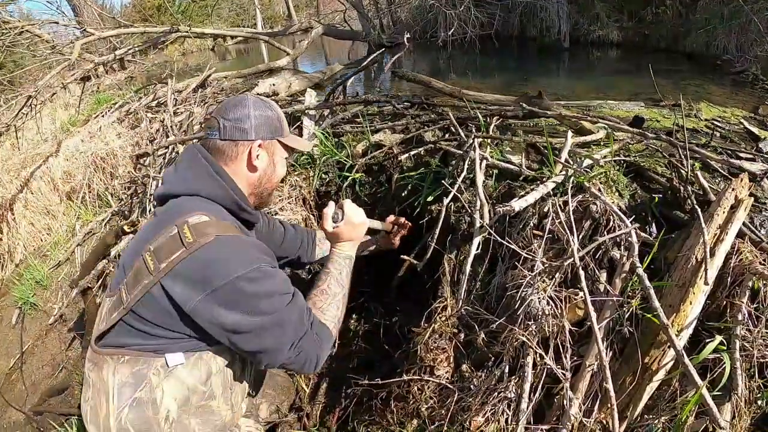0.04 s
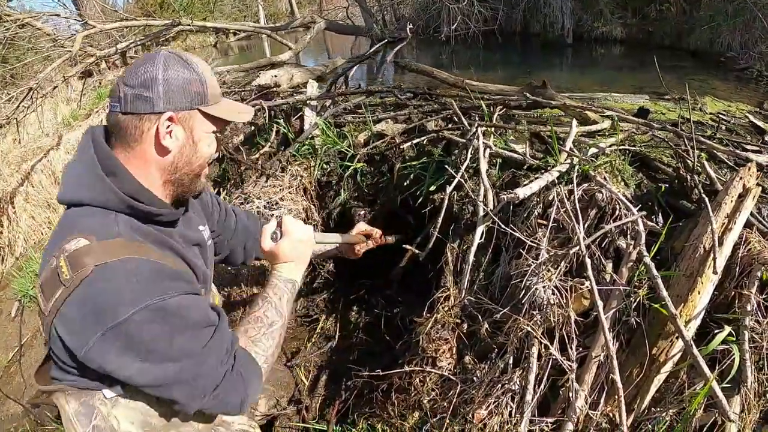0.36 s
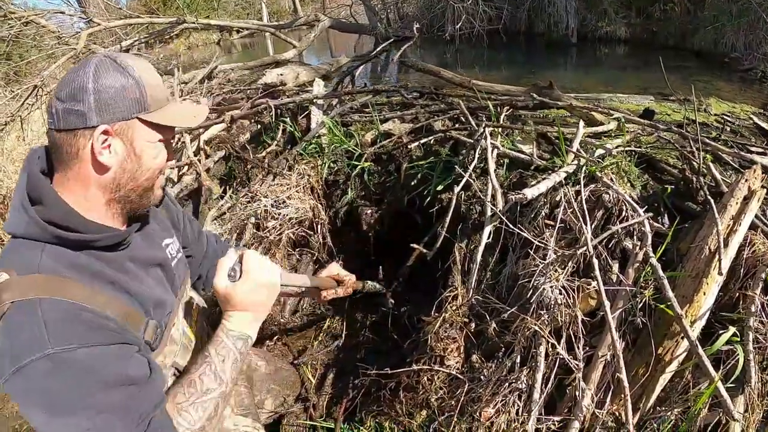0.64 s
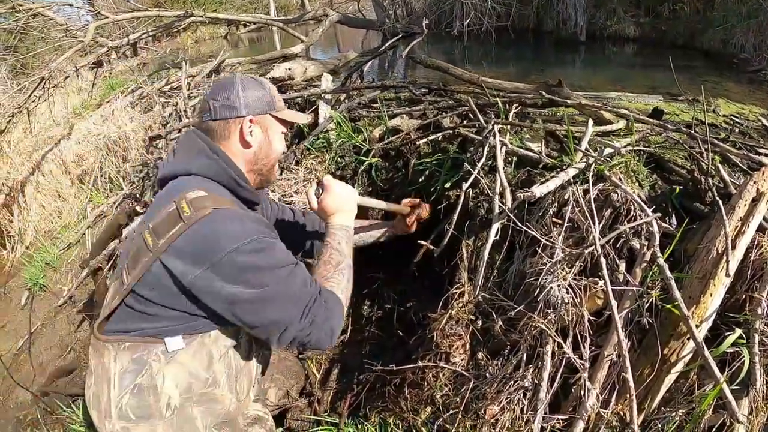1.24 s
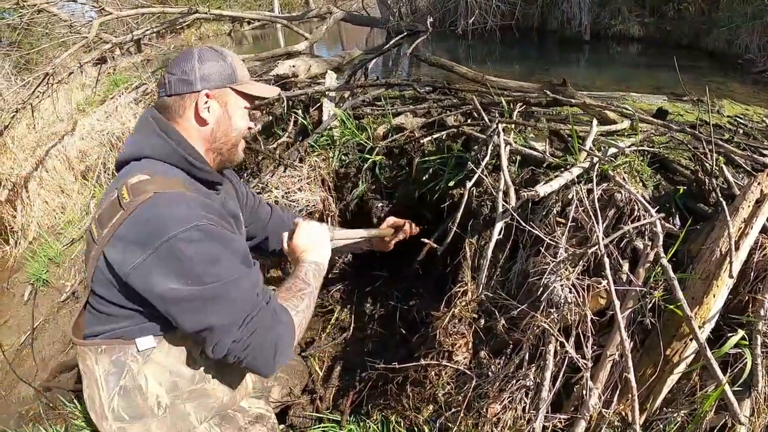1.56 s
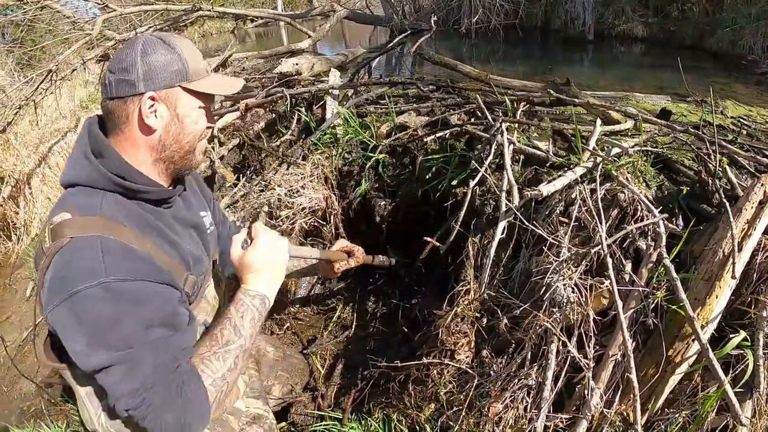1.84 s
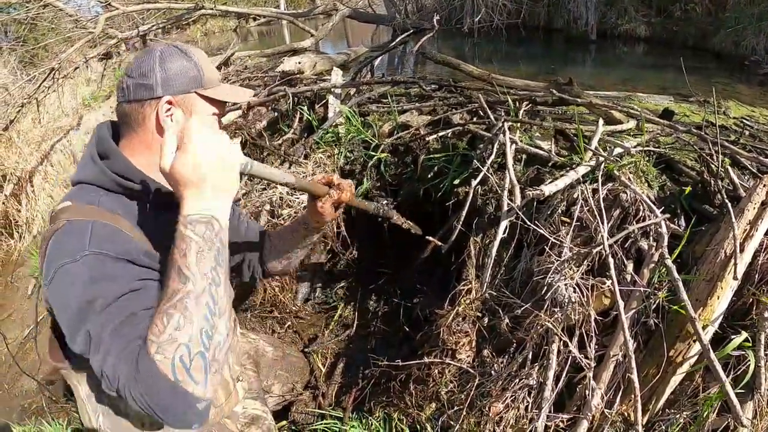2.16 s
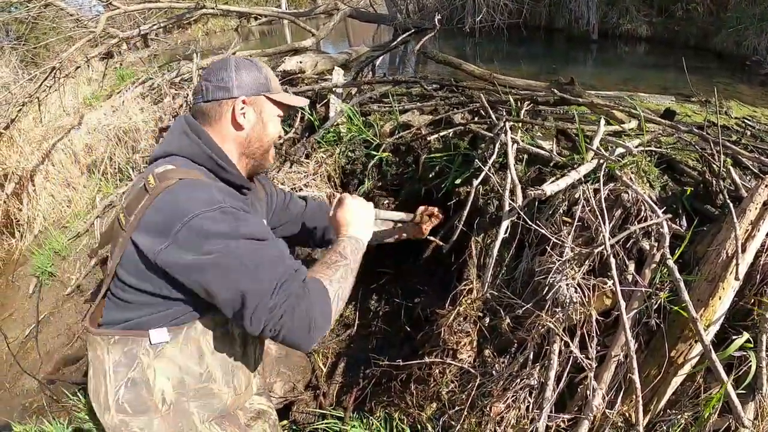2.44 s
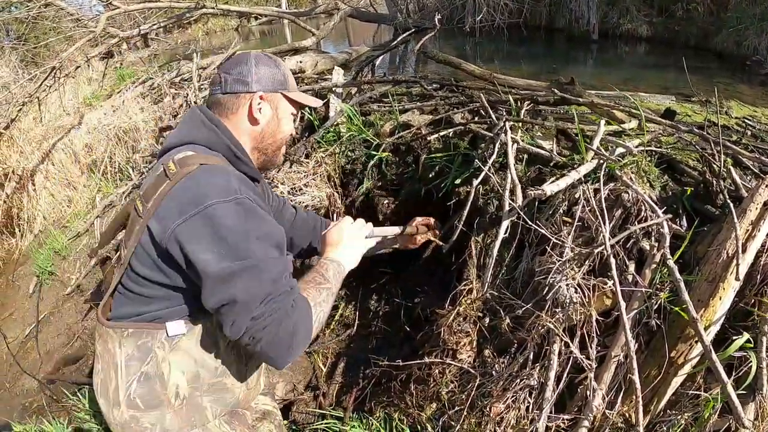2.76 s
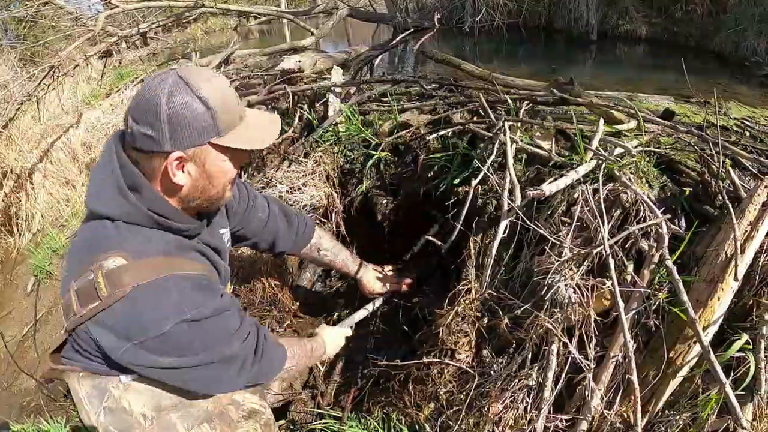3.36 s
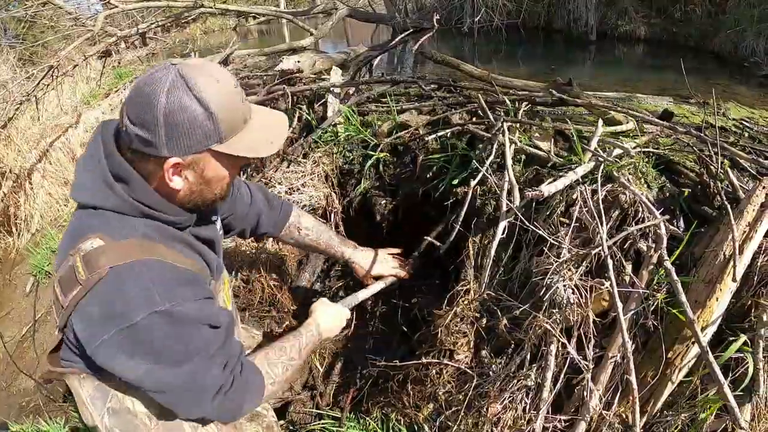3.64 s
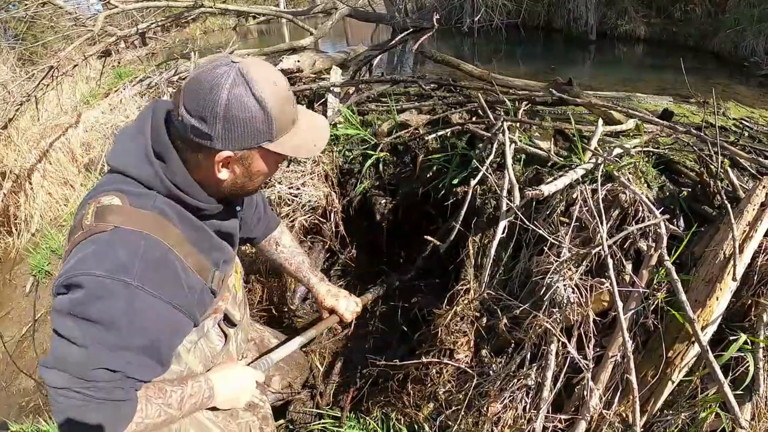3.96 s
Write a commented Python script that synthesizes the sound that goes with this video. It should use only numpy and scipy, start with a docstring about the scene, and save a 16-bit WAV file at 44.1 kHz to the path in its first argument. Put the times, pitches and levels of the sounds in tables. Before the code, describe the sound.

A long-handled tool chops into a dam of mud and sticks, close up outdoors. About five blows thud and snap twigs, some with a light steel clink, followed by smaller cracks and scrapes. Water trickles softly underneath.

```python
"""A long-handled tool chops and prises at a dam of mud and sticks, close up, outdoors. Each blow thuds in the
mud, snaps twigs and may ring the steel head; between blows the tool drags through wet brush. Underneath, water
pours over the dam in a steady bed of rush, bubbles and crackle, with single drips on top. Near the end, a few
soft low thumps sound."""
import sys
import numpy as np
from scipy import signal
from scipy.fft import rfft, irfft
from scipy.io import wavfile
from scipy.ndimage import uniform_filter1d, map_coordinates

SR = 44100
rng = np.random.default_rng(int(sys.argv[2]) if len(sys.argv) > 2 else 0)


def store_pcm(level_fs):
    """Save levels as 16-bit WAV."""
    pcm = np.round(np.clip(level_fs, -1, 1) * 32767).astype(np.int16)
    wavfile.write(sys.argv[1], SR, np.atleast_2d(pcm).T)


N = 176400
LEVEL_S = .008  # a hit carries the energy of this long a sound at its level
TOP_HZ = 15300  # upper limit of the mix


def undb(db):
    """Decibels to gain."""
    return 10 ** (np.asarray(db) / 20)


def unit_rms(x):
    """Scale to rms 1."""
    return x / np.sqrt(np.mean(x ** 2))


def hit(x, db=0):
    """Scale a one-shot to the energy of LEVEL_S seconds at this level."""
    return x * undb(db) / np.sqrt(np.sum(x ** 2) / (LEVEL_S * SR))


def add(out, at, x):
    """Mix x in from `at` seconds."""
    start = int(np.clip(at * SR, 0, N - 1))
    out[start:start + len(x)] += x[:N - start]


def shot_time():
    """Quarter-second time axis of a one-shot."""
    return np.arange(SR // 4) / SR


def attack(t, rise_s):
    """Exponential onset."""
    return 1 - np.exp(-t / rise_s)


def decay(t, t60):
    """Exponential tail, 60 dB down at t60."""
    return np.exp(-np.log(1000) * t / t60)


def mode(t, hz, t60):
    """One damped resonance."""
    return np.sin(2 * np.pi * hz * t) * decay(t, t60)


def band(x, lo_hz, hi_hz):
    """Low cut of 12 dB and high cut of 18 dB an octave."""
    x = signal.sosfilt(signal.butter(2, lo_hz, "high", fs=SR, output="sos"), x)
    return signal.sosfilt(signal.butter(3, min(hi_hz, .45 * SR), fs=SR, output="sos"), x)


def eq(x, curve):
    """Equalise along (frequency [Hz], gain [dB]) points."""
    hz, db = np.array(curve).T
    bins_hz = np.maximum(np.fft.rfftfreq(x.shape[-1], 1 / SR), 1)
    return irfft(rfft(x) * undb(np.interp(np.log(bins_hz), np.log(hz), db)), x.shape[-1])


def diffuse(x, impulse):
    """Convolve with an impulse response scaled to unit energy."""
    return signal.fftconvolve(x, impulse / np.sqrt(np.sum(impulse ** 2)))[:N]


def wander(rate_hz):
    """Smooth random modulation, spread near 1."""
    points = rng.standard_normal(1024)
    return map_coordinates(points, [np.arange(N) / SR * rate_hz], order=2, mode="mirror")


def grains(n, spread_db, grain_samples=24):
    """Dense tiny fractures, each with its own strength."""
    grain_db = spread_db * np.clip(rng.standard_normal(n // grain_samples + 1), -3, 3)
    strength = np.repeat(undb(grain_db), grain_samples)[:n]
    return unit_rms(strength * rng.standard_normal(n))


def whiten(x):
    """Flatten a burst's spectrum, keeping its fine texture; mute the second half."""
    spectrum = rfft(x)
    contour = np.sqrt(uniform_filter1d(abs(spectrum) ** 2, size=200))
    return irfft(spectrum / contour, len(x)) * (np.arange(len(x)) < len(x) / 2)


def twig_tone(x, lo_hz, hi_hz):
    """The band in which damp twigs sound; the wider it is, the more fizz sits on top."""
    fizz_gain = undb(-16.5) * np.clip((hi_hz - lo_hz) / 4500, .05, 1.3) ** 2.5
    return band(x, lo_hz, hi_hz) + fizz_gain * band(x, lo_hz=8500, hi_hz=14000)


def bubble(hz, cycles):
    """A bubble rings and chirps upward as it dies."""
    life = cycles / hz
    t = np.arange(int(life * SR) + 2) / SR
    chirp = np.sin(2 * np.pi * hz * t * (1 + .037 * t / life))
    return chirp * decay(t, life) * attack(t, 2 / hz)


def litter(per_s=70, lowest_hz=900, octaves=2.5, range_db=11):
    """Small twigs and crumbs of mud tick at random, each in its own band."""
    out, t = np.zeros(N), shot_time()[:1024]
    for when, pitch, size in rng.random((int(per_s * N / SR), 3)):
        hz = lowest_hz * 2 ** (octaves * pitch)
        tick = band(rng.standard_normal(len(t)) * decay(t, t60=.028), hz, hz * 1.81)
        add(out, when * N / SR, hit(tick, range_db * size ** 2))
    return unit_rms(out)


def bubble_swarm(per_s=600, centre_hz=2914, spread_octaves=.9, spread_db=4.5):
    """Small bubbles of many sizes blend into a bright trickle."""
    out = np.zeros(N)
    for when, pitch, size, ring in rng.standard_normal((int(per_s * N / SR), 4)):
        hz = centre_hz * 2 ** (spread_octaves * pitch)
        if hz < TOP_HZ:
            at = (when * 1000) % (N / SR)  # wrapping scatters the onsets evenly
            blip = bubble(hz, cycles=39 * np.exp(.46 * ring))
            add(out, at, hit(blip, spread_db * min(size, 2)))
    return unit_rms(band(out, lo_hz=600, hi_hz=7000))


# Tone of the falling water (frequency [Hz], gain [dB])
RUSH_EQ = [(20, -38), (40, -13), (70, -13.5), (135, -8), (220, -1), (340, -5.5), (560, -8), (1000, -13),
           (2000, -14.5), (3500, -18.5), (5600, -19), (7500, -25), (10000, -34), (15000, -39)]
# Fader rides on the water bed (time [s], rush gain [dB], trickle and crackle gain [dB])
WATER_FADERS = [(0, -40.5, -54), (.25, -40, -41), (.7, -38, -38), (1.15, -36.5, -44), (1.42, -40.5, -45.5),
                (1.75, -37.5, -39.5), (2.25, -36, -42.5), (2.6, -37, -45), (2.9, -36, -39.5),
                (3.4, -35.5, -41.5), (4, -37, -39)]


def water():
    """Water pours over the dam: a low gurgling rush, small bubbles and the crackle of wet litter."""
    rush = unit_rms(eq(rng.standard_normal(N), RUSH_EQ))
    body = signal.sosfilt(signal.butter(1, 700, fs=SR, output="sos"), rush)
    gurgle = body * undb(.87 * wander(rate_hz=35))
    splash = (rush - body) * undb(2.2 * wander(rate_hz=90))
    trickle = undb(-6.5) * litter() + undb(-3) * bubble_swarm()
    at, rush_db, trickle_db = np.array(WATER_FADERS).T
    t = np.arange(N) / SR
    rush_gain = undb(np.interp(t, at, rush_db))
    trickle_gain = undb(np.interp(t, at, trickle_db))
    return (gurgle + splash) * rush_gain + trickle * trickle_gain


# Soft low thumps (time [s], level [dB], pitch [Hz])
THUMP_CUES = [(3.58, -30.5, 75.5), (3.637, -34.5, 135), (3.679, -32.5, 90), (3.797, -29.5, 97)]


def low_thumps():
    """A few soft low thumps that die within a few cycles."""
    out, t = np.zeros(N), shot_time()
    for at, db, hz in THUMP_CUES:
        add(out, at, hit(mode(t, hz, t60=.036) * attack(t, rise_s=.004), db))
    return out


# Spot drips and mud plops (time [s], level [dB], pitch [Hz], ring length [cycles])
DRIP_CUES = [(.294, -26.5, 1345, 18), (.308, -32, 1140, 30), (0.801, -37, 2450, 26),
             (2.236, -32, 2184, 130), (2.388, -34, 3850, 77), (2.834, -30.5, 6330, 50),
             (2.864, -35, 1500, 51), (2.875, -34, 2160, 57), (3.553, -33, 2480, 50),
             (3.654, -25, 1855, 100), (3.661, -35, 1570, 25)]


def drips():
    """Drops fall into the water and small pockets pop in the mud."""
    out = np.zeros(N)
    for at, db, hz, cycles in DRIP_CUES:
        add(out, at, hit(bubble(hz, cycles), db))
    return out


# Drags through wet brush (time [s], length [s], level [dB], low cut [Hz], high cut [Hz])
DRAG_CUES = [(0.29, 0.034, -33, 880, 3020), (.335, .015, -33.5, 600, 3000), (0.361, .05, -36, 1380, 7000),
             (0.554, 0.025, -26.5, 1080, 4840), (0.613, 0.12, -39.5, 1100, 6700),
             (1.253, 0.028, -33, 450, 3500), (1.624, 0.041, -30, 760, 3570),
             (1.679, 0.064, -37.5, 900, 4500), (1.845, 0.068, -26, 500, 5260),
             (2.428, 0.071, -30, 800, 3700), (2.473, 0.057, -20.5, 247, 3900),
             (2.928, 0.15, -37, 1180, 3250), (3.616, 0.021, -33.5, 2190, 4350),
             (3.644, 0.03, -30, 1500, 2800), (3.741, 0.093, -33.5, 1300, 2420)]


def brush_drags(jerks_per_s=165, jerk_db=2.5):
    """The tool catches and slips through brush: a swell of crackle that comes in small jerks."""
    out, t = np.zeros(N), shot_time()
    for at, length, db, lo_hz, hi_hz in DRAG_CUES:
        swell = np.sin(np.pi * np.minimum(t / length, 1)) ** .26
        jerks = map_coordinates(rng.standard_normal(256), [t * jerks_per_s], order=1, mode="mirror")
        crackle = grains(len(t), spread_db=3, grain_samples=48)
        rub = twig_tone(crackle * swell * undb(jerk_db * jerks), lo_hz, hi_hz)
        add(out, at, hit(rub, db) * np.sqrt(length / LEVEL_S))  # hold the level for the whole drag
    return out


# Resonances of the steel head (frequency [Hz], gain [dB], t60 [s])
HEAD_MODES = [(1333, -9, .13), (2350, 2, 0.14), (3170, -8, 0.094), (4820, 5, 0.057), (7400, 0, .08)]
# Contacts on the head (time [s], level [dB], most excited frequency [Hz])
CLINK_CUES = [(0.296, -28.5, 1200), (0.603, -26.5, 1200), (1.841, -21, 3470), (1.935, -33.5, 3150),
              (2.015, -33, 3300), (2.032, -31, 4900), (2.433, -25.5, 1680), (2.449, -29, 1650)]


def head_clinks():
    """The steel head rings, damped by the mud; the point of contact picks the modes."""
    out, t = np.zeros(N), shot_time()
    for at, db, centre_hz in CLINK_CUES:
        ring = sum(undb(mode_db - 84 * np.log2(hz / centre_hz) ** 2) * mode(t, hz, t60)
                   for hz, mode_db, t60 in HEAD_MODES)
        add(out, at, hit(ring * attack(t, rise_s=.0015), db))
    return out


# Resonances of the packed mud (pitch [ratio], gain [dB], t60 [ratio])
MUD_MODES = [(1, 1, 1), (1.8, -6.5, .8), (2.5, -3, 0.55), (3.1, -2.5, 0.65), (4.3, -18, 0.67)]
# Blows into the mud (time [s], level [dB], pitch [Hz], t60 of the lowest mode [s])
THUD_CUES = [(.001, -15, 277, .06), (.007, -18.5, 135, 0.061), (.603, -28.5, 145, 0.062),
             (1.2385, -22, 536, 0.022), (1.2463, -16, 225.4, 0.094), (1.844, -20.5, 489, 0.019),
             (1.890, -27.5, 383, 0.021), (2.487, -20, 185.4, 0.13), (2.498, -18, 322, 0.051),
             (2.516, -25.5, 252, 0.061)]


def mud_thuds():
    """The weight of each blow: packed mud and sticks give a damped knock and a dull squelch."""
    out, t = np.zeros(N), shot_time()
    onset = attack(t, rise_s=.0012)
    for at, db, hz, t60 in THUD_CUES:
        knock = sum(undb(mode_db) * mode(t, hz * ratio, t60 * share)
                    for ratio, mode_db, share in MUD_MODES)
        squelch = band(rng.standard_normal(len(t)) * decay(t, t60 * 1.64), hz * .66, hz * 5.3)
        add(out, at, hit(onset * (hit(knock) + hit(squelch, db=-6)), db))
    return out


# Snapping sticks (time [s], level [dB], low cut [Hz], high cut [Hz], tear t60 [s],
# ring pitch [Hz], ring level against the tear [dB])
SNAP_CUES = [(.0005, -15, 200, 3250, .035, 2080, -11), (.0055, -12.5, 600, 2410, 0.028, 980, -1.5),
             (.011, -15.5, 600, 2400, .03, 737, -1), (0.023, -20.5, 750, 2440, 0.022, 1090, -7),
             (0.419, -23, 2500, 8400, 0.048, 4450, -6), (0.4233, -12, 1900, 6360, 0.028, 3500, -3),
             (0.4244, -22.5, 1500, 5000, 0.026, 1795, 1), (0.5902, -19, 860, 10200, 0.04, 5860, -4),
             (0.6002, -12.5, 960, 4900, 0.024, 2970, 0), (.606, -17.5, 700, 5000, 0.021, 1710, -3.5),
             (0.635, -32, 2600, 5500, .02, 3300, 3), (1.09, -30, 3480, 5700, 0.011, 5070, 2),
             (1.195, -29.5, 2500, 5270, 0.034, 3700, -8), (1.23, -18, 700, 7700, 0.11, 5430, -12),
             (1.2385, -13.5, 500, 5640, 0.012, 705, 1.5), (1.2453, -9.5, 594, 5200, 0.016, 2450, -10),
             (1.2533, -13, 800, 4600, 0.015, 3270, -4), (1.378, -34, 3020, 5440, .015, 4120, -4),
             (1.536, -32.5, 3000, 4600, 0.01, 3720, 0), (1.6745, -16, 940, 3820, 0.021, 3770, -4),
             (1.8376, -17, 900, 4850, 0.04, 3240, -1), (1.844, -19.5, 500, 3800, .035, 943, -6),
             (1.8886, -15, 700, 8100, .032, 1804, -3), (1.898, -25, 1200, 8200, 0.063, 4660, -8),
             (1.9678, -29, 2200, 4300, 0.016, 3050, 3), (2.146, -31.5, 1500, 5000, 0.039, 1750, -7),
             (2.429, -19, 496, 2430, 0.026, 1280, -17), (2.4867, -15.5, 1100, 4200, 0.049, 1600, -4),
             (2.507, -23, 900, 3840, 0.023, 2880, -1), (2.562, -33, 700, 3520, 0.025, 2680, -7),
             (3.111, -27.5, 1400, 5750, .03, 1880, -4), (3.188, -32.5, 1100, 4240, .025, 1290, -4),
             (3.239, -28, 1100, 3780, 0.063, 1500, -5), (3.2598, -20.5, 890, 4400, 0.028, 1364, -3.5),
             (3.303, -27.5, 1500, 2800, 0.039, 2080, 1), (3.717, -22, 706, 2000, 0.036, 1680, -4),
             (3.802, -24.5, 1400, 6240, 0.031, 1910, -8)]


def stick_snaps():
    """The bite of each blow: fibres tear in a quick dying burst and the stick rings briefly."""
    out, t = np.zeros(N), shot_time()
    onset = attack(t, rise_s=.00035)
    for at, db, lo_hz, hi_hz, t60, ring_hz, ring_db in SNAP_CUES:
        burst = grains(len(t), spread_db=3.5) * onset * decay(t, t60)
        tear = twig_tone(whiten(burst), lo_hz, hi_hz)
        ring_t60 = (t60 + 65 / ring_hz) / 2  # midway between the tear's decay and 65 cycles
        ring = onset * mode(t, ring_hz, ring_t60)
        add(out, at, hit(hit(tear) + hit(ring, ring_db), db))
    return out


# Stereo width, side against mid (frequency [Hz], gain [dB])
SIDE_EQ = [(20, -32), (100, -54), (400, -60), (1400, -51.5), (3000, -50), (5000, -31.5), (9500, -33),
           (11500, -14), (13000, 1), (16000, 0)]


def scene():
    """The work scatters briefly off the bank; the mix is centred, with width only in the top treble."""
    t = shot_time()
    work = stick_snaps() + mud_thuds() + brush_drags() + head_clinks() + drips()
    bank = band(rng.standard_normal(len(t)), lo_hz=413, hi_hz=6350) * decay(t, t60=.093)
    echo = diffuse(work, bank * (t > .004))  # 4 ms pre-delay
    mid = work + undb(-22.5) * echo + low_thumps() + water()
    smear = rng.standard_normal(len(t)) * decay(t, t60=.024)
    side = eq(diffuse(mid, smear), SIDE_EQ)
    hiss = unit_rms(band(rng.standard_normal(N), lo_hz=11000, hi_hz=14000))
    side += undb(-72.5) * hiss
    return np.array([mid + side, mid - side])


# Microphone response (frequency [Hz], gain [dB])
MIC_EQ = [(15, -14), (35, -3), (60, 7), (6000, -5.5), (7400, -8), (8600, -7.5), (9600, 1), (11000, -3),
          (12500, -12.5), (15000, -31)]


def record(dry):
    """The microphone warms the lows and dulls the top; peaks clip at full scale before a steep high cut."""
    heard = np.clip(eq(dry, MIC_EQ), -1, 1)
    return signal.sosfilt(signal.ellip(12, .2, 90, TOP_HZ, fs=SR, output="sos"), heard)


dry = scene()
out = record(dry)
store_pcm(out)
```